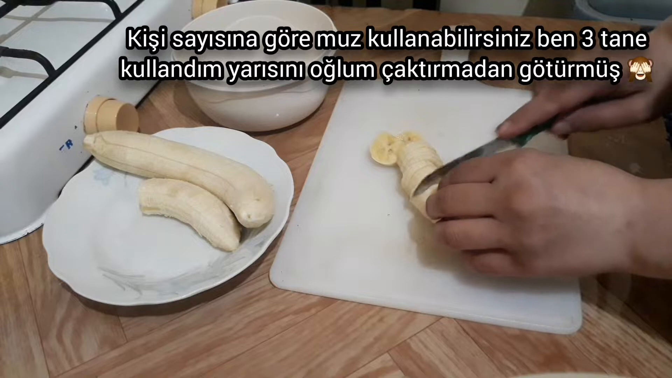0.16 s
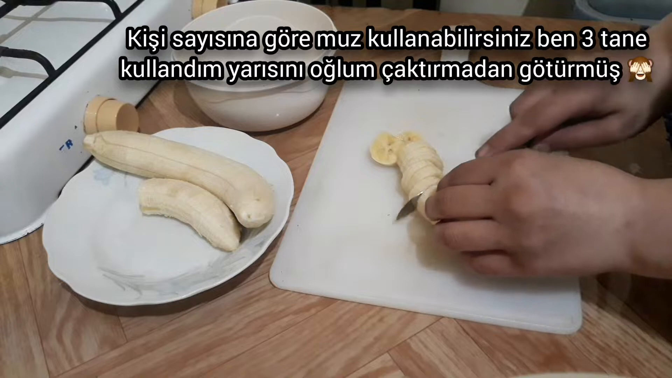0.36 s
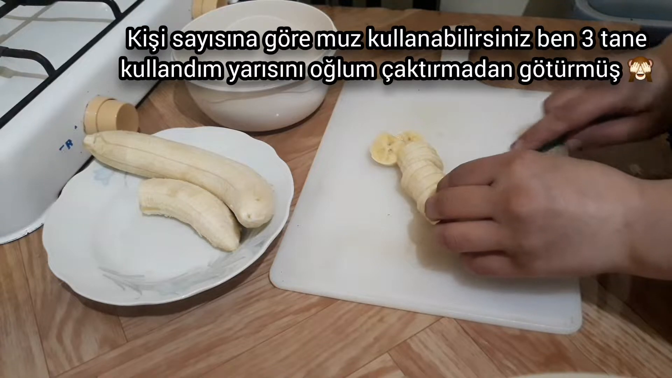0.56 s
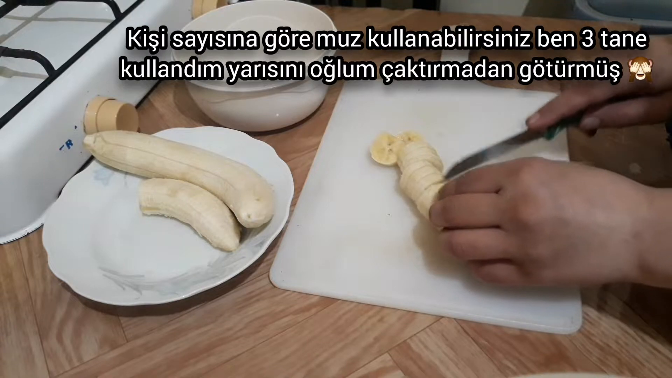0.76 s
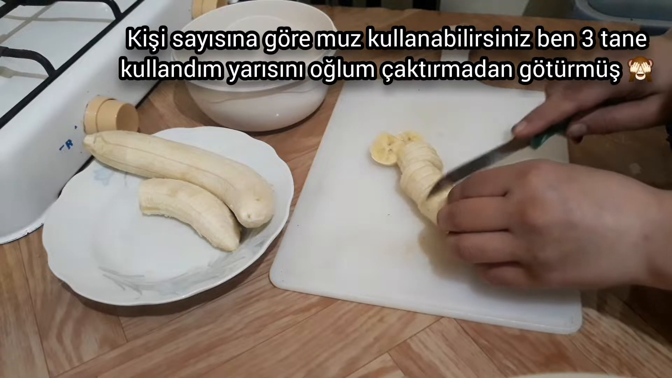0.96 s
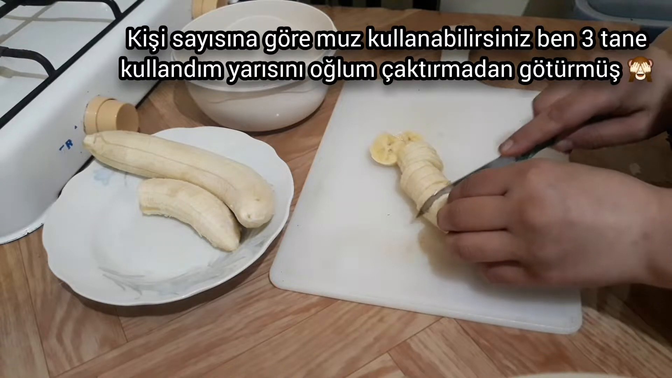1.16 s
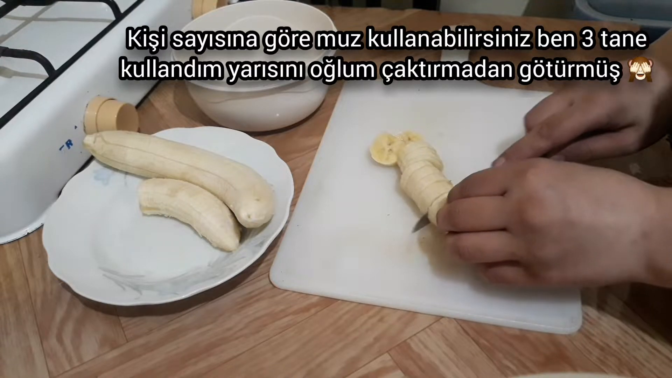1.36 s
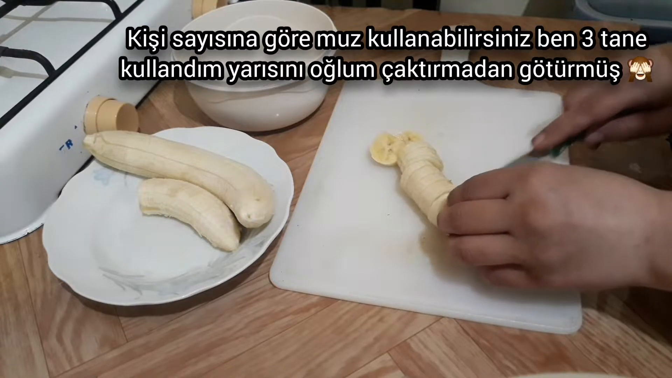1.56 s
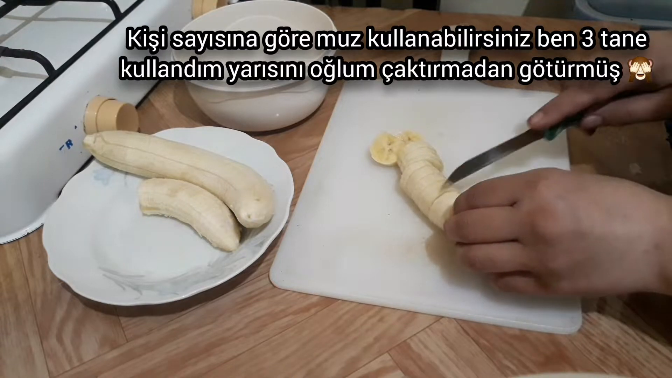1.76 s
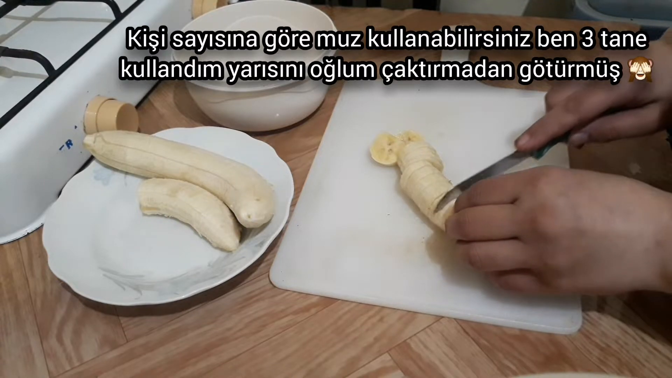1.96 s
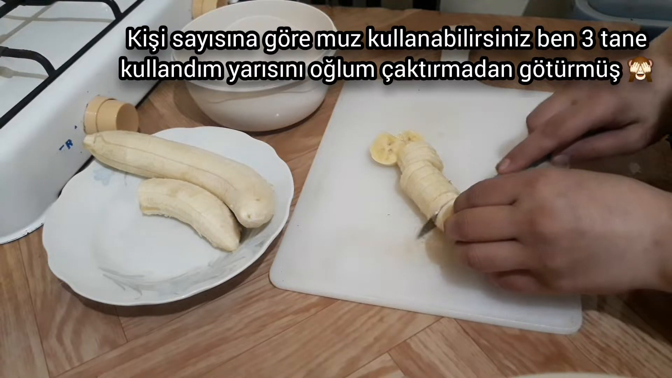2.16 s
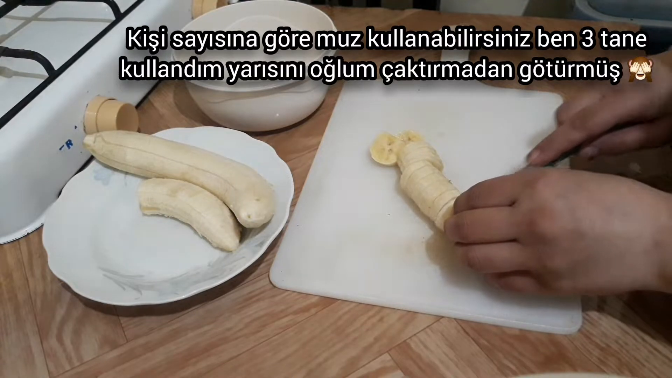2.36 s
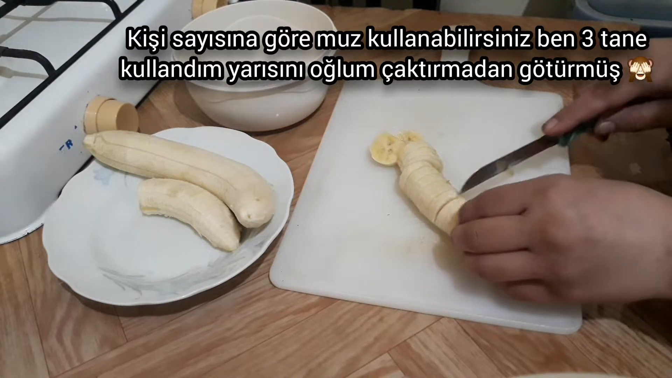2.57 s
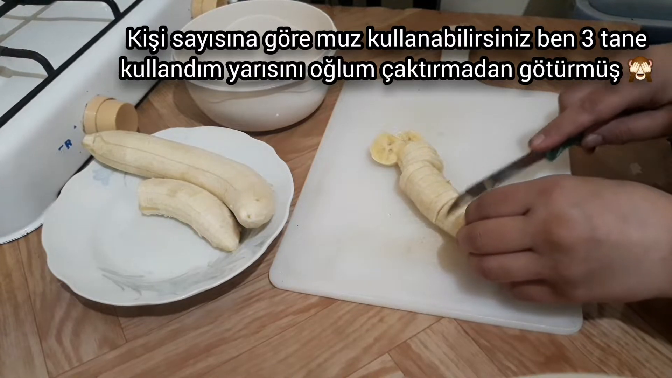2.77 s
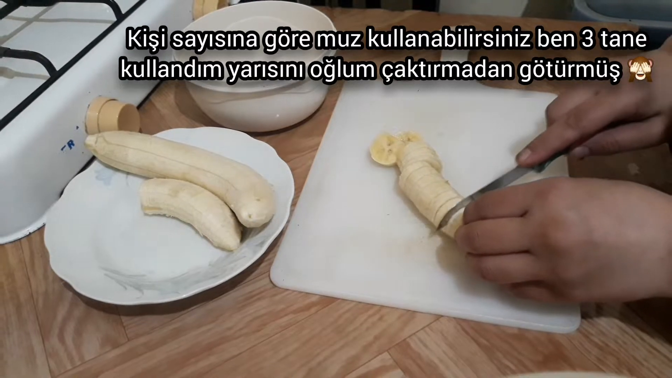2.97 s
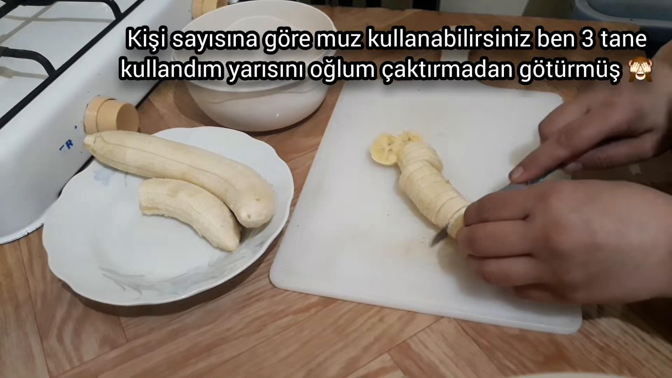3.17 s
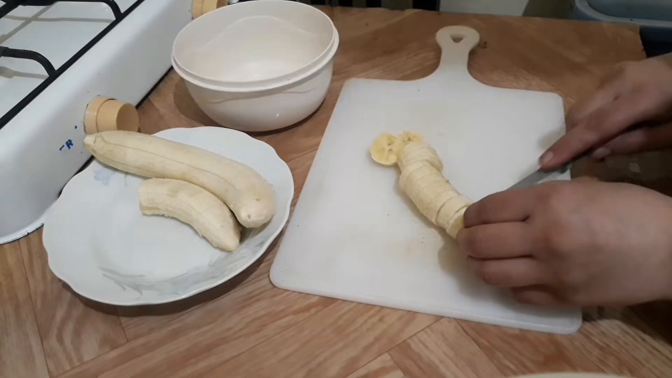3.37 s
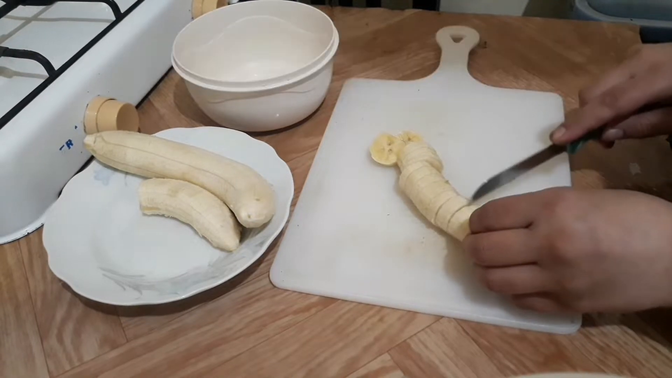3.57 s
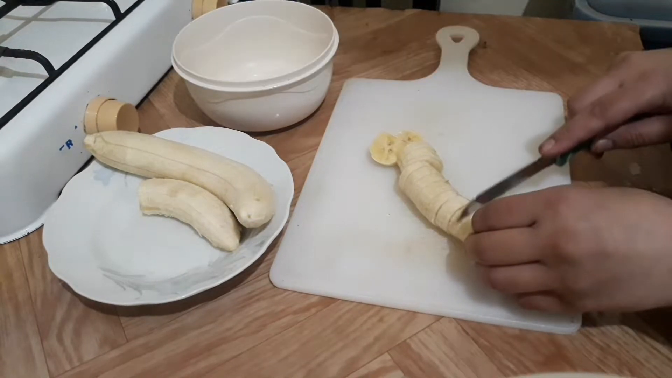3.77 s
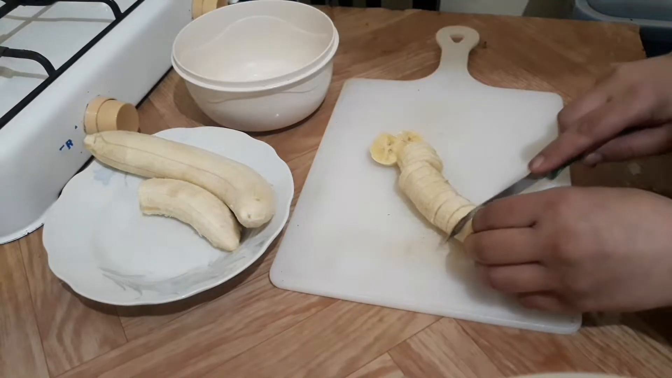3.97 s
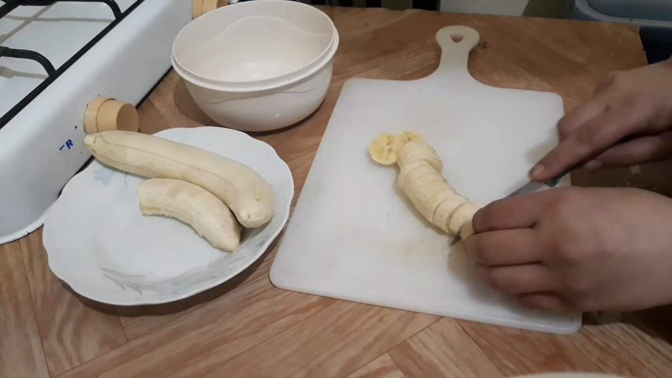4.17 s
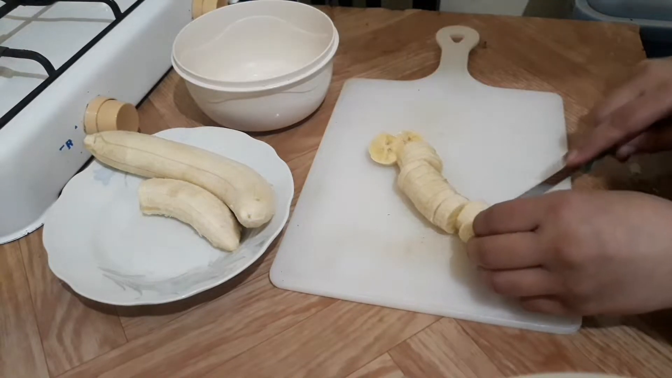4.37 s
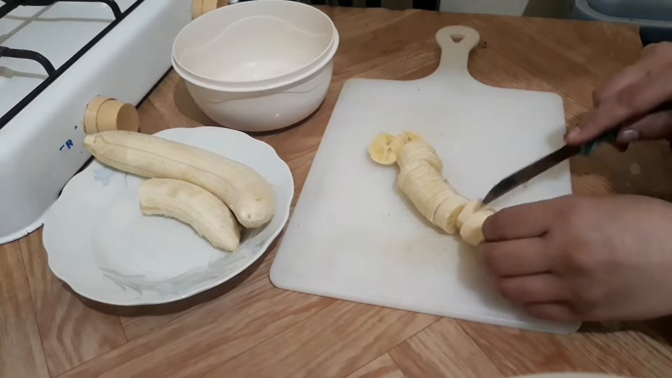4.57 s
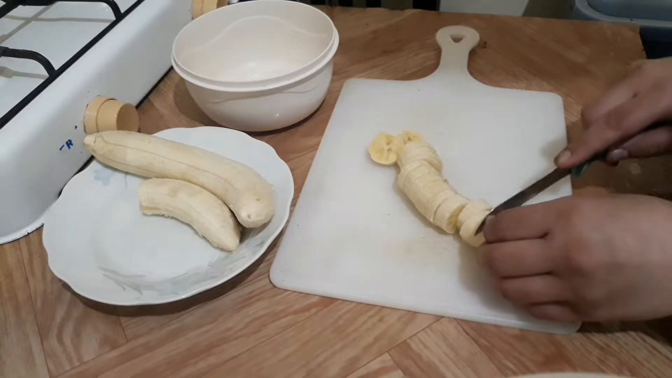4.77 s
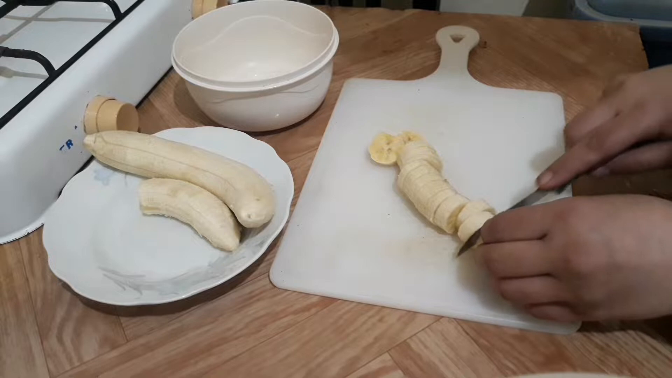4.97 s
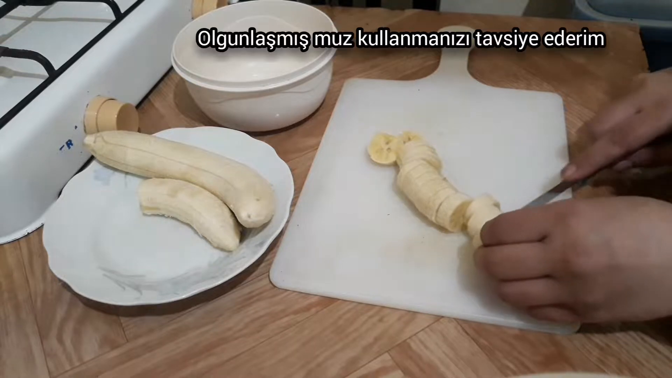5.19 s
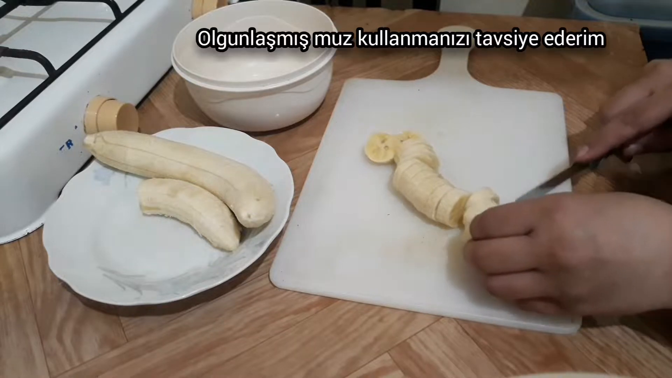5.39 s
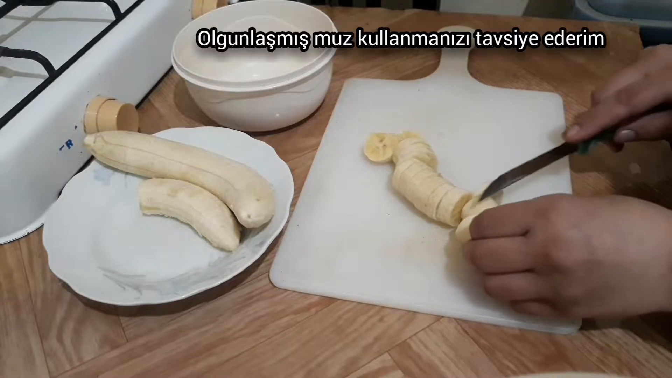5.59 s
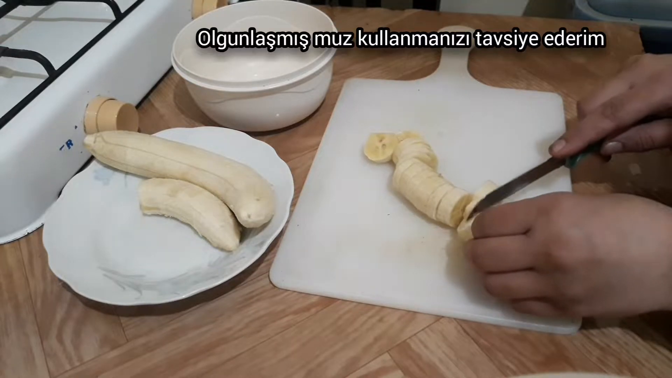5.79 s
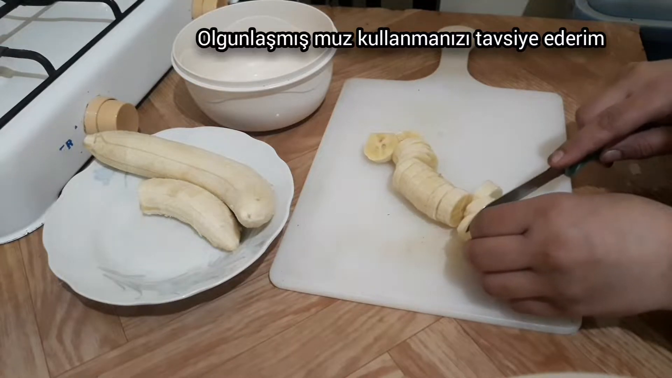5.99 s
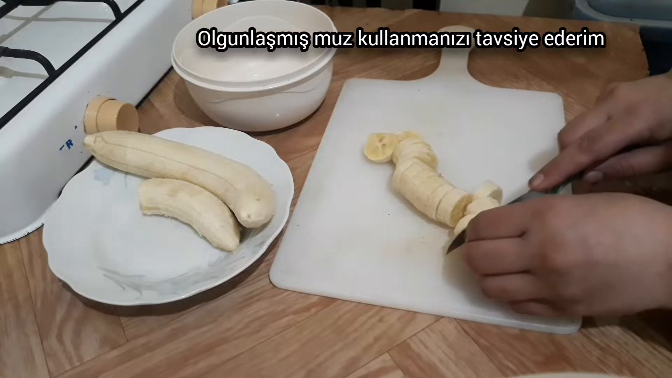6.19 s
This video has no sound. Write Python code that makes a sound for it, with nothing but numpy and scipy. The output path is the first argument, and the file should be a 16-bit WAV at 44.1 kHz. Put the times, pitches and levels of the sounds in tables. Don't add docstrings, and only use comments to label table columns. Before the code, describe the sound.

In a quiet small kitchen, close to a phone microphone, a knife cuts a soft banana about once a second. Each cut starts with a faint wet hiss, then the blade knocks on a thin plastic board and drags briefly with a rough, stuttering scrape. Tiny sticky ticks follow as slices part. A low house rumble and soft murmur continue underneath, with a faint distant pump note and pipe whistle coming and going.

```python
import sys
import numpy as np
from scipy import signal
from scipy.fft import rfft, irfft
from scipy.io import wavfile
from scipy.ndimage import uniform_filter1d

SR = 44100
rng = np.random.default_rng(int(sys.argv[2]) if len(sys.argv) > 2 else 0)


def magnitude_from_level(level_db):
    exponent = np.asarray(level_db, float) / 20
    return 10 ** exponent


def master_out(mix):
    frames = np.transpose(np.atleast_2d(mix))
    ceiling = np.clip(frames, -1, 1)
    pcm = np.round(ceiling * 32767).astype(np.int16)
    wavfile.write(sys.argv[1], SR, pcm)


N = 275184

# (time [s], level [dB])
HOUSE_BUSY = [(0.0, -6.5), (0.2, 5.5), (0.4, 5), (0.6, -0.5), (1.36, 2), (1.8, -1.5), (2.3, 2.5),
              (2.7, 0.5), (3.5, 0.7), (3.7, -3.5), (4.2, 1.2), (4.7, -3), (5.14, 4.5), (5.5, 0.4),
              (5.96, -2), (6.24, 2.3)]
# (frequency [Hz], density [dB per Hz])
RUMBLE = [(15, -80), (25, -22), (49, -29), (70, -3), (97, -8), (129, 3.5), (156, -3), (174, -11.5),
          (220, -7), (290, -42), (480, -120)]
MURMUR = [(120, -36), (200, -8.5), (274, -1), (322, -6.5), (421, -8), (459, -11.5), (504, -11),
          (673, -19.5), (1300, -34.5), (1690, -43), (2860, -120)]
MIC_HISS = [(530, -13.5), (900, -0.5), (967, -6.5), (1050, -5.5), (1850, -8), (2010, -9), (2550, -11),
            (4540, -10), (6280, -13.5), (10400, -16), (15100, -11), (15800, -7.5)]
# (frequency [Hz], level [dB])
APART = [(100, -42), (1000, -16), (4000, -5.5), (8000, -4), (8500, -21), (16000, -23)]
RUMBLE_DB, MURMUR_DB, MIC_HISS_DB = -64, -65.5, -74
RUMBLE_FOLLOWS = 0.3
SHAKE_DB = -24

# (loudest [s], hiss level [dB], rise [s], fall [s], top end above hiss [dB])
SLICING = [(0.285, -72, 0.11, 0.56, -15), (1.204, -64, 0.064, .11, -10), (2.08, -65.5, 0.082, .14, -11),
           (2.185, -69.5, .06, .03, -6), (2.498, -78, 0.17, 0.12, -1), (3.09, -69.5, 0.15, 0.082, -8),
           (4.036, -70.5, 0.16, 0.06, -11), (4.19, -66, 0.14, .02, -5), (4.45, -76, .04, .3, -5),
           (4.538, -78, .02, 0.14, 4), (4.702, -79, .02, .3, 5), (4.948, -71, 0.12, .18, -13),
           (5.088, -66.5, 0.091, 0.022, 1.5), (5.12, -58.5, .05, 0.12, -8), (5.31, -70, .03, 0.19, -4),
           (5.475, -67.5, 0.025, 0.094, -27), (6.19, -71, 0.2, 0.092, -11)]
# (time [s], peak level [dB], top end above peak [dB], pop frequency [Hz])
TICKS = [(1.1674, -65, -2, 7720), (1.1767, -54, -13, 7780), (2.0728, -57, -18, 5130),
         (2.206, -45.5, -5, 6560), (2.2295, -41, -22, 6000), (2.2515, -44, -25, 5510),
         (2.3256, -59, -29, 4620), (3.0188, -59, 5, 6540), (3.2315, -42, 0, 8200), (4.0207, -52, -17, 4600),
         (4.1101, -59, -13, 7500), (4.2543, -44, 5, 4590), (4.5373, -53, 0, 8240), (4.5514, -58, 8, 7560),
         (4.7037, -53, 7, 7800), (5.029, -54, -11, 7580), (5.0528, -50, 2, 8060), (5.094, -39, 10.5, 7100),
         (5.2514, -47, -5, 4900), (5.2731, -44, -1, 4500), (5.2784, -51.5, 11, 4940),
         (5.32, -53, -28, 4940), (5.4625, -45, -24, 5100), (5.672, -63, 6, 8400)]
# (frequency [Hz], density [dB per Hz])
WET = [(2500, -5.5), (4200, -4.5), (5200, 1), (7500, 2), (8800, -0.5), (9800, -36)]
WET_TOP = [(8500, -36), (11500, -9), (14500, -5), (17000, -9)]

# (lands [s], lifts [s], pressure on landing [dB], midway [dB], on lifting [dB])
DRAGS = [
    (0.412, 0.551, -43.5, -44.5, -41.5),
    (1.355, 1.446, -48, -41, -43.5),
    (2.212, 2.339, -49.5, -43.5, -40),
    (3.168, 3.327, -43, -45.5, -35.5),
    (4.196, 4.321, -36, -42.5, -40.5),
    (5.1, 5.263, -48.5, -40, -46.5),
]
# (clack above thud [dB], rap above thud [dB], edge above thud [dB],
# settling time [s], fading time [s])
PLACES = [(0, -12.5, -9, 0.0035, 0.049), (1.5, -7, -13, 0.068, 0.061), (0, -9.5, -11.5, 0.033, 0.042),
          (-2.5, -8, -10.5, .002, 0.047), (-2.5, -5.5, -9, 0.0018, 0.043), (-5, -12.5, -16, .004, 0.046)]
# (time [s], clack level [dB], thud above clack [dB], blade chatter [Hz], edge above clack [dB])
LANDINGS = [(0.416, -35.5, 6, 1500, -38), (1.254, -43, 0.5, 1570, -11), (1.328, -45, 2, 1770, -26),
            (1.344, -37, -2, 1690, -23), (1.354, -27, -2.5, 1690, -13.5), (2.163, -65, 20, 1730, -20),
            (2.224, -54.5, 21.5, 1150, -5), (3.086, -60, 10, 2020, -0.5), (3.161, -28, -4.5, 1960, -16),
            (4.198, -21.5, -3, 1970, -14), (5.095, -46, 14, 1530, -19), (5.46, -60.5, 8.5, 1920, 3)]
CATCHES = [(0.475, -34, -2, 1240, -10), (0.55, -33, 7.5, 1740, -14), (0.561, -34, 1, 1730, -15),
           (1.409, -32, 4, 1720, -22), (1.422, -29, 0.5, 1770, -20), (1.442, -34, 9, 1590, -11),
           (2.252, -42.5, 12, 1760, -20), (2.289, -36, 6.5, 1860, -11), (2.315, -30, 0.5, 1610, -15),
           (2.326, -32, -10, 1830, -12.5), (2.346, -45, -3, 1830, 1), (3.242, -40, 10, 1770, -22),
           (3.2865, -29.5, -1, 1150, -15), (3.316, -27, 1, 1920, -16), (3.335, -44, -2, 1060, -15),
           (4.209, -34, 0, 1750, -19), (4.26, -27, 1.5, 1550, -22), (4.28, -37.5, 8, 2070, -7),
           (4.318, -30.5, -3, 1840, -9.5), (5.143, -30, 1, 1590, -11.5), (5.181, -30, 4.5, 1570, -9),
           (5.206, -32, -26, 1670, -11), (5.247, -44, 11, 1560, -16), (5.267, -42, -14, 1810, -13)]
# (frequency [Hz], width [Hz], level [dB])
THUD = [(121, 7.2, -13.5), (202, 205, -2.5), (340.4, 20, -3.5), (388, 53, 1), (438, 55, 3.5),
        (516, 47, -4.5), (679, 85, -4.5)]
CLACK = [(827, 53, -6.5), (1050, 45, -8), (1100, 130, -26), (1150, 46, -1), (1277, 85, -4), (1469, 230, 3),
         (1580, 200, 5.5), (1684, 154, 2), (1881, 93, -5)]
RAP = [(2022, 114, 0.5), (2413, 117, 6), (2533, 122, 3.5), (2943, 520, 3.5)]
EDGE = [(2950, 2200, 2), (3760, 360, -1), (4220, 190, -7.5), (4790, 410, 2), (4900, 940, 1.5),
        (6660, 1400, -4.5), (7380, 480, -7), (8280, 2000, -12.5)]
SHEEN = [(12500, 1400, 12.5), (15200, 2000, 11)]
EDGE_LIFT_SHARE, SCRATCH_ENDS_DB = 0.51, -6
STICK_DB, STICK_S = -4, 0.0058

# (loudest [s], level [dB], rise [s], fall [s], frequency [Hz])
WHINE = [(0.67, -74, 0.044, 0.19, 1484), (0.95, -78, .4, .3, 1490), (1.12, -70.5, 0.22, 0.59, 1530),
         (1.3, -71, .3, .1, 1633), (3.46, -71.5, 0.056, 0.17, 1457), (5.07, -73, 0.13, .05, 1516),
         (5.41, -77, .2, 0.053, 1480)]
WHINE_WIDTH_HZ = 150
# (loudest [s], level [dB], rise [s], fall [s])
DRONE = [(1.23, -63.5, .33, 0.13), (1.6, -72, .1, 0.45), (1.918, -62, 0.23, .12), (2.072, -60.5, 0.24, 0.1),
         (2.532, -64, .1, .07), (2.778, -62.5, 0.11, 0.065), (3.118, -64.5, 0.29, 0.09)]
DRONE_HZ = 424

# (frequency [Hz], time to fall 60 dB [s])
ROOM = [(200, 0.12), (1000, 0.24), (4000, 0.17), (12000, 0.18)]
# (frequency [Hz], level [dB])
TREBLE_SHELF = [(0, 0), (15800, 0), (15900, -36), (22050, -40)]


def evened(x):
    return x / np.sqrt(np.mean(x ** 2) + 1e-20)


def read(points, hz):
    f, value = np.transpose(points)
    return np.interp(np.log(hz + 1), np.log(f + 1), value)


def smooth(rows):
    return np.array([np.interp(np.arange(N), np.arange(0, N, 16), row) for row in rows])


def swells(rows, column=0):
    t, power = np.arange(0, N, 16) / SR, 0
    for row in rows:
        loudest, db, rise, fall = row[:4]
        peak_db = db + (row[column] if column else 0)
        away = np.maximum((loudest - t) / rise, (t - loudest) / fall)
        power = power + magnitude_from_level(peak_db - 20 * away) ** 2
    return smooth([np.sqrt(power)])[0]


def grains(per_s, spread_db):
    size = magnitude_from_level(spread_db * np.minimum(rng.exponential(1, N), 4)) * rng.choice([-1, 1], N)
    return evened(size * (rng.random(N) < per_s / SR))


def bursts(rows, length_s, column, db, hz=0., rough=1.):
    t, out = np.arange(400) / SR, np.zeros(N + 400)
    clean = np.sin(2 * np.pi * np.outer(hz * np.ones(len(rows)), t))
    contact = np.exp(-t / length_s) * (1 - np.exp(-2 * t / length_s))
    shapes = (clean + rough * rng.standard_normal((len(rows), 400))) * contact
    for row, shape in zip(rows, shapes):
        at = round(row[0] * SR)
        level_db = row[1] + (row[column] if column else 0) + db
        out[at:at + 400] += magnitude_from_level(level_db) * shape / np.linalg.norm(shape)
    return out[:N]


def pressure():
    t, out = np.arange(0, N, 16) / SR, 0
    stick_db = sum(STICK_DB * (t < s) * np.exp(-abs(t - s) / STICK_S) for s, *_ in CATCHES)
    for drag, place in zip(DRAGS, PLACES):
        lands, lifts, a_db, mid_db, b_db = drag
        clack_db, rap_db, edge_db, settle, fade = place
        u = np.clip((t - lands) / (lifts - lands), 0, 1)
        bend = (2 * u - 1) ** 2
        before_db = 20 * np.minimum(t - lands, 0) / settle
        after_db = -20 * np.maximum(t - lifts, 0) / fade
        db = mid_db + (b_db - a_db) * (u - 0.5) + ((a_db + b_db) / 2 - mid_db) * bend
        db = db + after_db + stick_db
        scratch_db = mid_db + edge_db + SCRATCH_ENDS_DB * bend + EDGE_LIFT_SHARE * after_db + 0.5 * stick_db
        levels_db = np.array([db, db + clack_db, db + rap_db, scratch_db]) + before_db
        out = out + magnitude_from_level(np.maximum(levels_db, -200))
    return smooth(out)


def noise(colour, patchy_db, size=1024):
    frames, hz = 4 * N // size + 8, np.fft.rfftfreq(size, 1 / SR)
    a, b, c, d, patches = rng.standard_normal((frames, len(hz), 5)).T
    patches = uniform_filter1d(patches, size=6, axis=0)
    patches = evened(uniform_filter1d(patches, size=10, axis=1))
    inside = (hz >= colour[0][0]) & (hz <= colour[-1][0])
    z = np.array([a + 1j * b, (c + 1j * d) * magnitude_from_level(read(APART, hz))[:, None]])
    z *= magnitude_from_level(read(colour, hz)[:, None] + patchy_db * patches) * inside[:, None]
    mid, side = signal.istft(z, nperseg=size, noverlap=3 * size // 4)[1][:, :N]
    return evened(np.array([mid + side, mid - side]))


def house():
    busy_db = np.interp(np.arange(N) / SR, *np.transpose(HOUSE_BUSY))
    shake = magnitude_from_level(SHAKE_DB) * uniform_filter1d(pressure()[0], size=3000)
    rumble = (magnitude_from_level(RUMBLE_DB + RUMBLE_FOLLOWS * busy_db) + shake) * noise(RUMBLE, patchy_db=1.2, size=2048)
    murmur = magnitude_from_level(MURMUR_DB + busy_db) * noise(MURMUR, patchy_db=2.0, size=1024)
    return rumble + murmur + magnitude_from_level(MIC_HISS_DB) * noise(MIC_HISS, patchy_db=0.93, size=512)


def flesh():
    fizz = 0.9 * rng.standard_normal(N) + 0.25 * grains(per_s=900, spread_db=3)
    pops = bursts(TICKS, 0.00076, column=0, db=6.5, hz=np.array(TICKS)[:, 3], rough=0.9)
    body = swells(SLICING) * fizz + pops
    top = swells(SLICING, column=4) * rng.standard_normal(N)
    top = top + bursts(TICKS, 0.0008, column=2, db=8.0, rough=8.)
    out = 0
    for push, colour in [(body, WET), (top, WET_TOP)]:
        response = magnitude_from_level(read(colour, np.fft.rfftfreq(128, 1 / SR)))
        taps = np.fft.fftshift(irfft(response)) * np.hanning(128)
        out = out + signal.oaconvolve(push, taps / np.linalg.norm(taps), "same")
    return out


def ring(modes):
    t, out = np.arange(4096) / SR, 0
    for k, (hz, width, db) in enumerate(modes):
        decay = np.sqrt(width) * np.exp(-np.pi * width * t)
        out = out + (-1) ** k * magnitude_from_level(db) * decay * np.sin(2 * np.pi * hz * t)
    return out / np.linalg.norm(out)


def board():
    on_thud, on_clack, on_rap, on_edge = pressure()
    knocks = LANDINGS + CATCHES
    slips = grains(per_s=1300, spread_db=4.5)
    hiss = rng.standard_normal(N)
    judder = grains(per_s=810, spread_db=2.0)
    blow = bursts(knocks, 0.0022, column=2, db=13, hz=410, rough=0.02)
    chatter = bursts(knocks, 0.001, column=0, db=10, hz=np.array(knocks)[:, 3], rough=0.05)
    scrape = bursts(knocks, 0.0024, column=4, db=17.0, rough=8.)
    thud = on_thud * magnitude_from_level(-4) * (0.78 * slips + 0.88 * judder) + magnitude_from_level(-21.5) * blow
    clack = on_clack * magnitude_from_level(-4.5) * slips + magnitude_from_level(-10.5) * chatter
    rap = on_rap * magnitude_from_level(-4.0) * slips + magnitude_from_level(-9.5) * chatter
    edge = on_edge * magnitude_from_level(-3) * (0.86 * slips + 1.06 * hiss) + scrape
    sheen = on_edge * magnitude_from_level(-17.5) * hiss
    pairs = [(thud, THUD), (clack, CLACK), (rap, RAP), (edge, EDGE), (sheen, SHEEN)]
    ringing = sum(signal.oaconvolve(push, ring(modes))[:N] for push, modes in pairs)
    return blow + magnitude_from_level(-9.5) * chatter + ringing


def kitchen(x):
    taps = np.zeros(SR // 2)
    at = np.arange(120, SR // 2 - 20, 20)
    taps[at + rng.integers(0, 20, len(at))] = rng.choice([-1., 1.], len(at))
    hz, t, z = signal.stft(taps, SR, nperseg=256)
    tail = signal.istft(z * magnitude_from_level(-60 * t / read(ROOM, hz)[:, None]), SR, nperseg=256)[1]
    return signal.fftconvolve(x, tail / np.linalg.norm(tail))[:N]


def resonance(rows, hz, width_hz, steady):
    turn = np.exp(2j * np.pi * np.cumsum(hz * np.ones(N)) / SR)
    r = np.exp(-np.pi * width_hz / SR)
    slow = signal.lfilter([1], [1, -2 * r, r * r], rng.standard_normal((N, 2)) @ [1, 1j])
    return swells(rows) * evened((turn * (steady + slow / np.std(slow))).real)


def pipe():
    s, *_, hz = np.transpose(WHINE)
    pitch = np.interp(np.arange(N) / SR, s, hz)
    return resonance(WHINE, pitch, WHINE_WIDTH_HZ, steady=0.3)


def pump():
    return resonance(DRONE, DRONE_HZ, width_hz=29, steady=0.44)


def scene():
    near = board() + flesh()
    near = near + magnitude_from_level(-7.5) * kitchen(near)
    near = signal.sosfilt(signal.butter(2, 90, "high", fs=SR, output="sos"), near)
    slope = np.gradient(near)
    late = 0.048 * slope + 0.17 * np.gradient(np.gradient(slope))
    return near + late * [[1], [-1]] + pipe() + pump() + house()


def top_cut(x):
    return signal.sosfilt(signal.butter(12, 16950, fs=SR, output="sos"), x)


def record(dry):
    gain = magnitude_from_level(np.interp(np.fft.rfftfreq(N, 1 / SR), *np.transpose(TREBLE_SHELF)))
    limited = irfft(rfft(dry) * gain, N)
    return top_cut(limited)


dry = scene()
out = record(dry)
master_out(out)
```